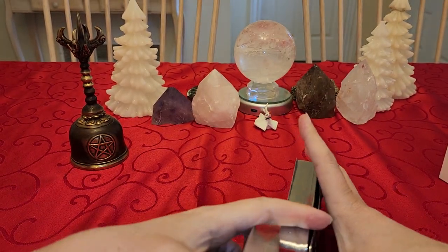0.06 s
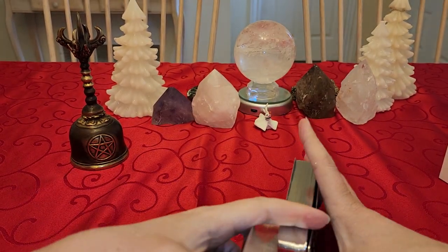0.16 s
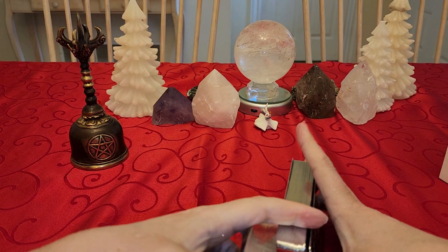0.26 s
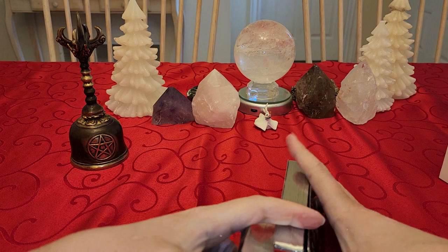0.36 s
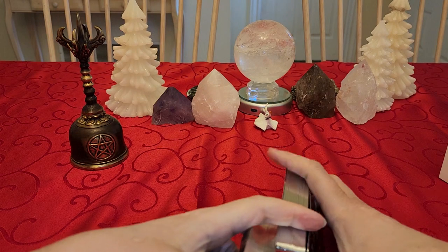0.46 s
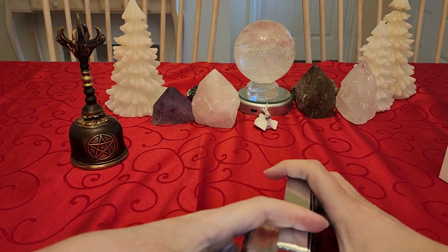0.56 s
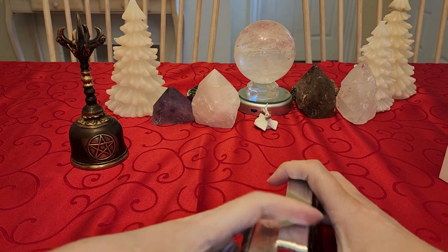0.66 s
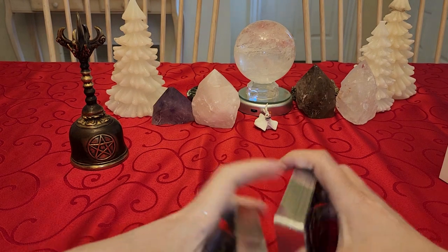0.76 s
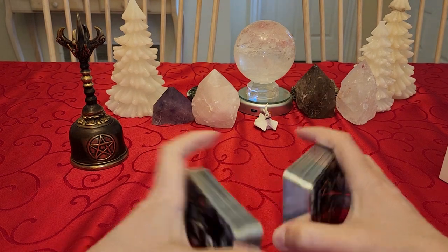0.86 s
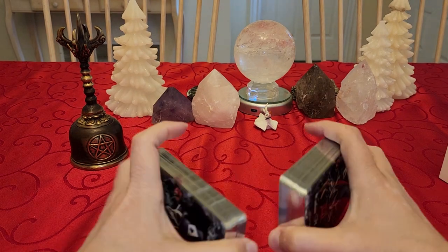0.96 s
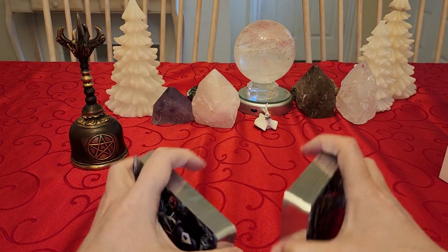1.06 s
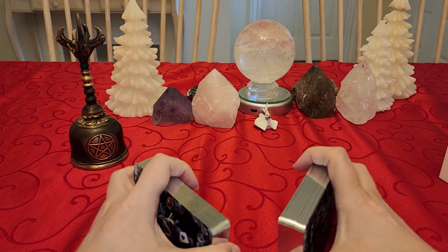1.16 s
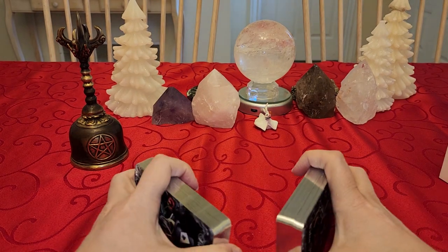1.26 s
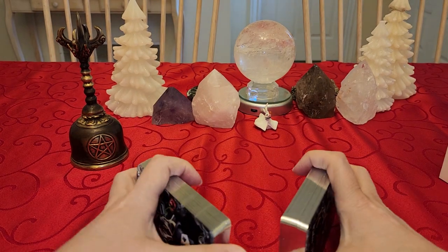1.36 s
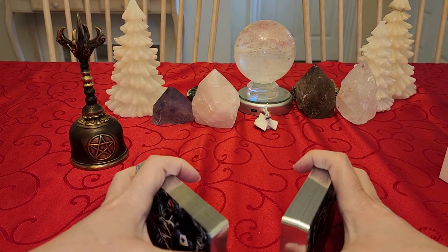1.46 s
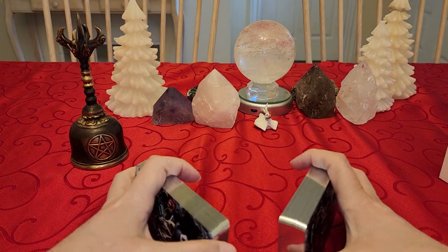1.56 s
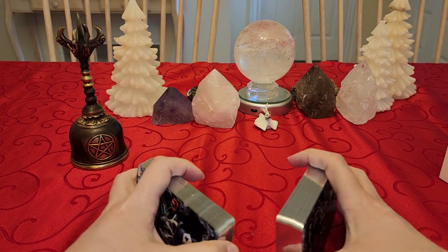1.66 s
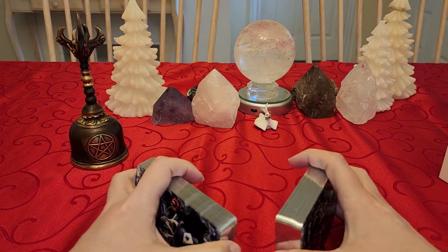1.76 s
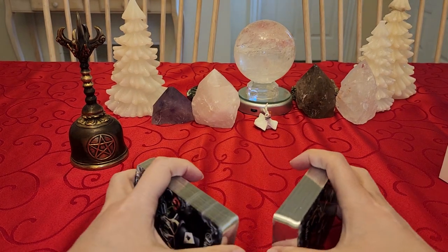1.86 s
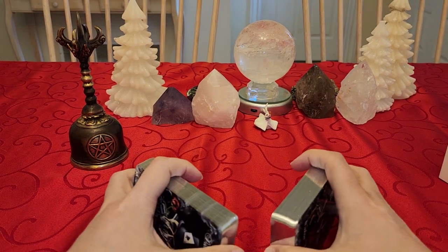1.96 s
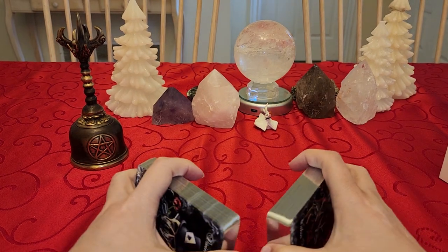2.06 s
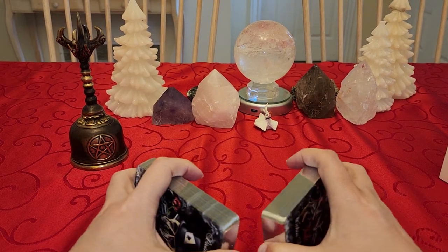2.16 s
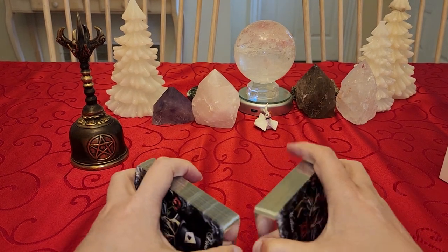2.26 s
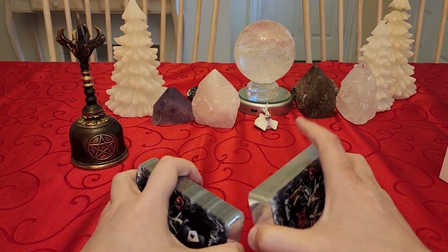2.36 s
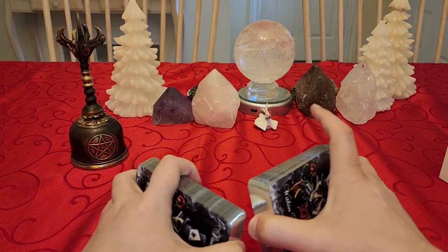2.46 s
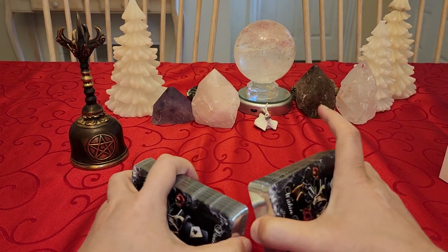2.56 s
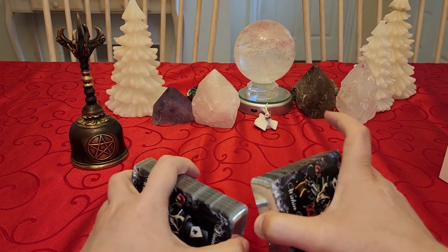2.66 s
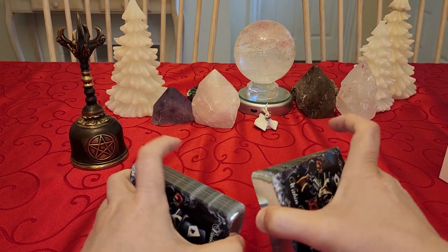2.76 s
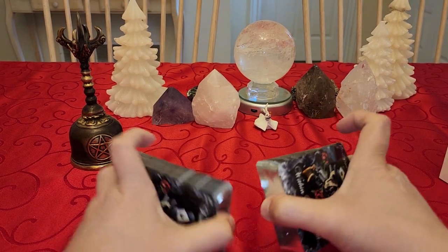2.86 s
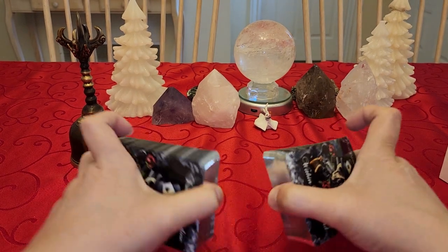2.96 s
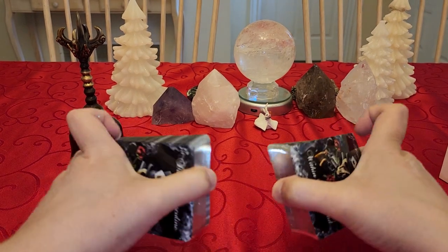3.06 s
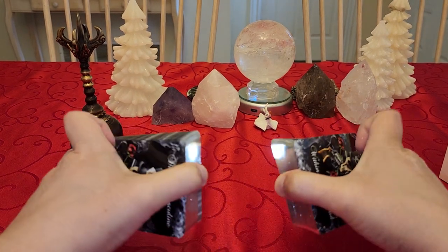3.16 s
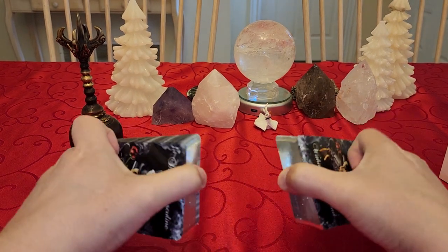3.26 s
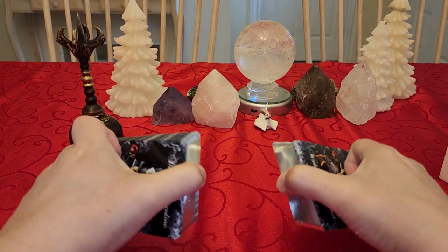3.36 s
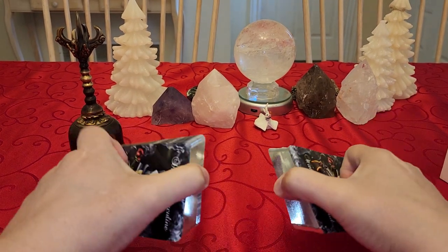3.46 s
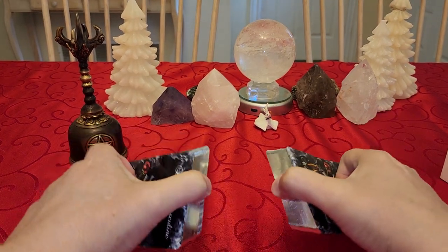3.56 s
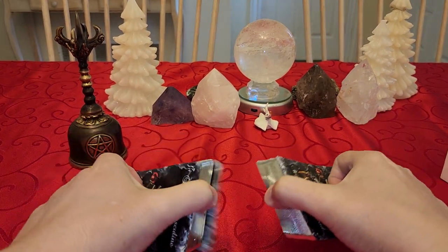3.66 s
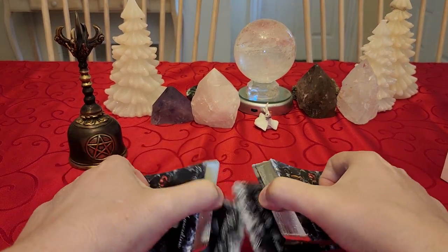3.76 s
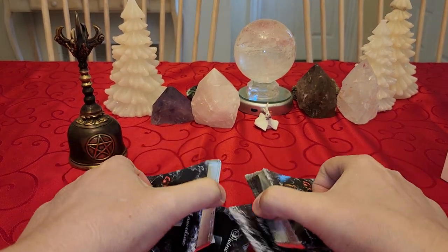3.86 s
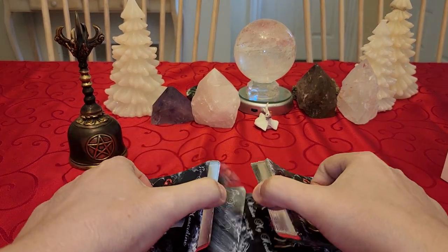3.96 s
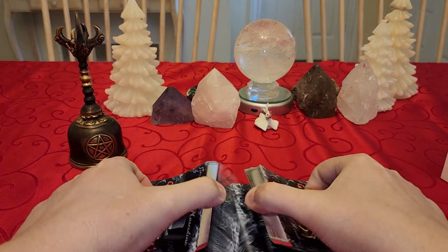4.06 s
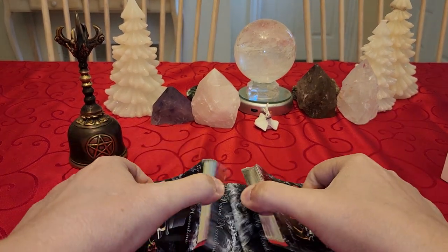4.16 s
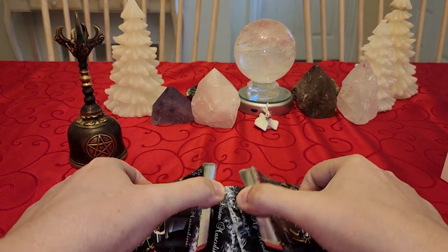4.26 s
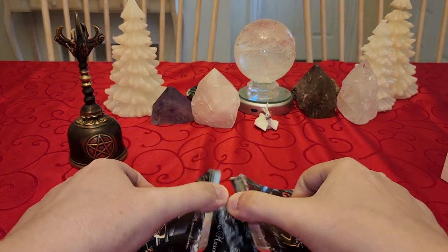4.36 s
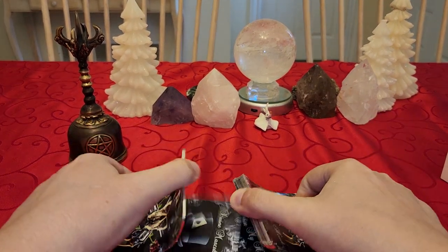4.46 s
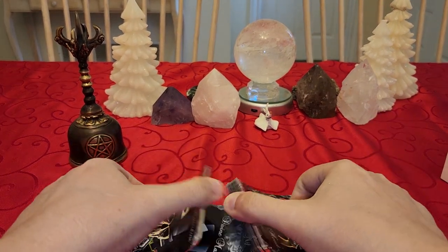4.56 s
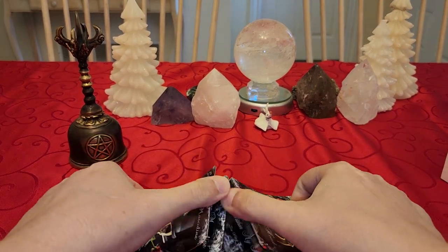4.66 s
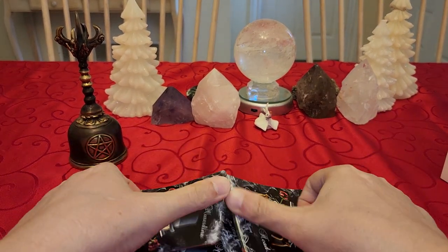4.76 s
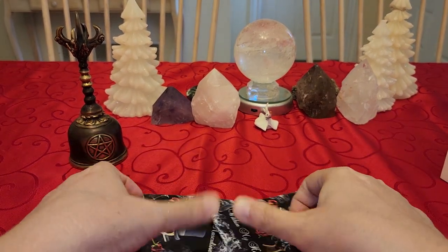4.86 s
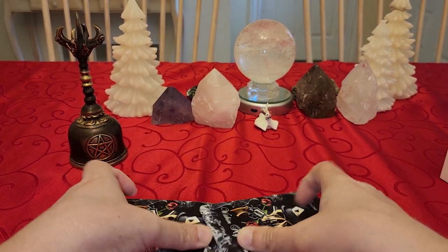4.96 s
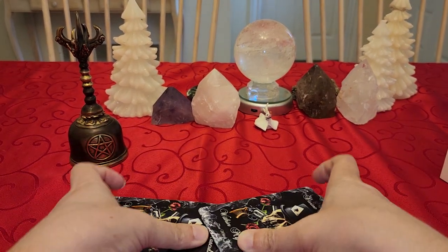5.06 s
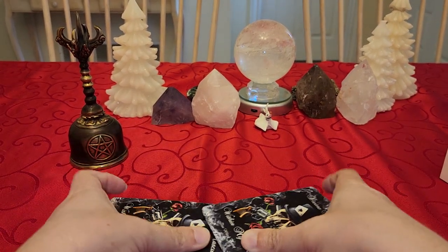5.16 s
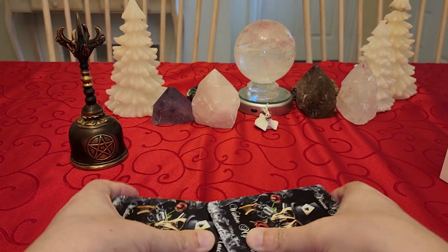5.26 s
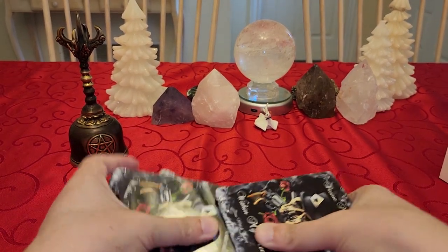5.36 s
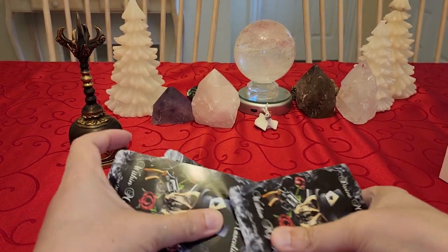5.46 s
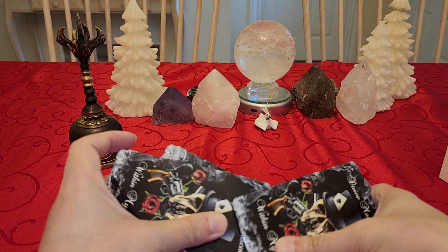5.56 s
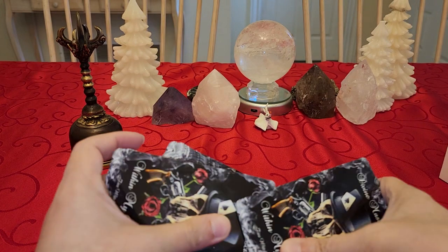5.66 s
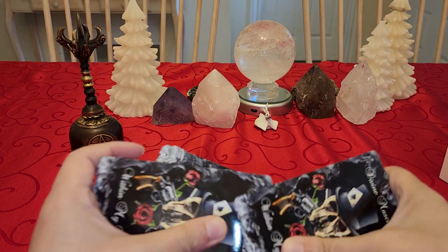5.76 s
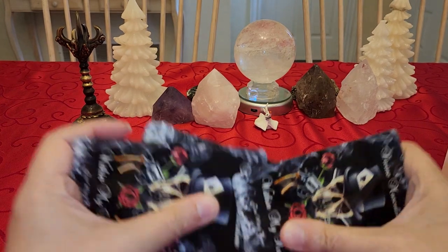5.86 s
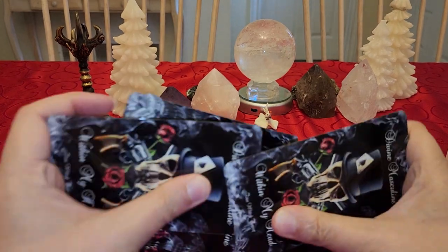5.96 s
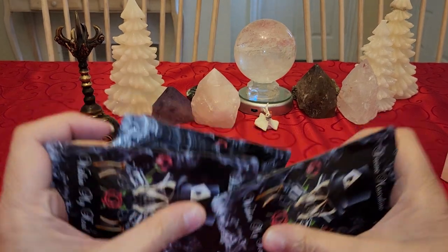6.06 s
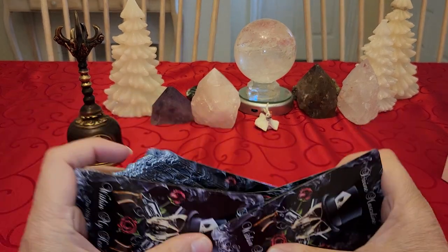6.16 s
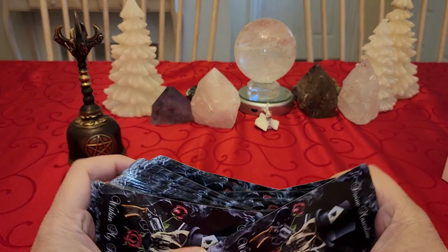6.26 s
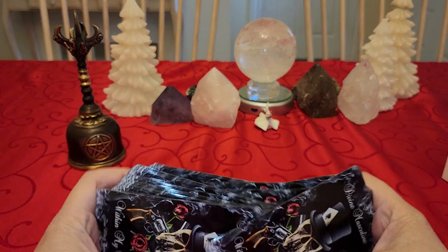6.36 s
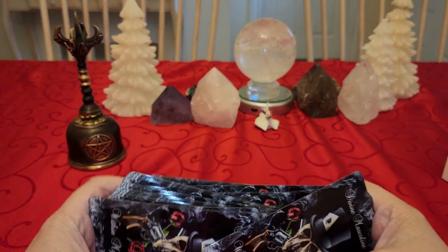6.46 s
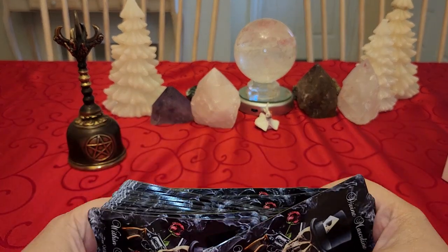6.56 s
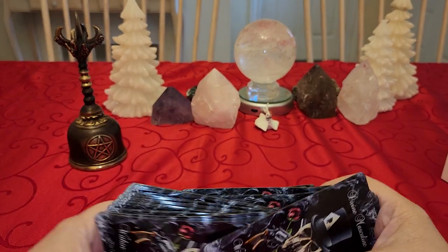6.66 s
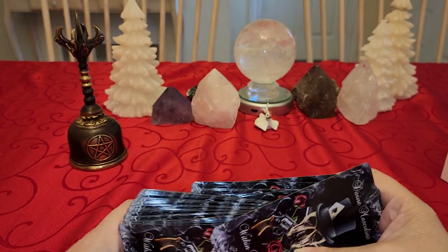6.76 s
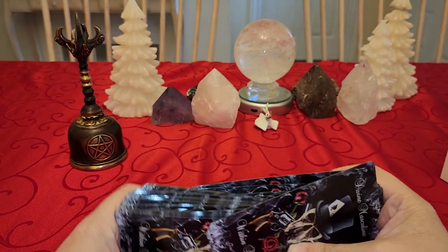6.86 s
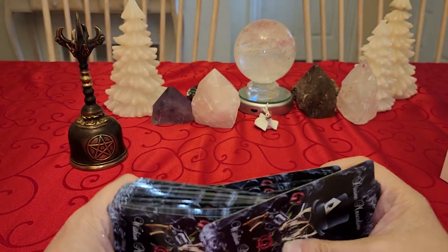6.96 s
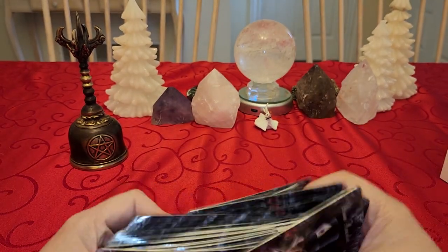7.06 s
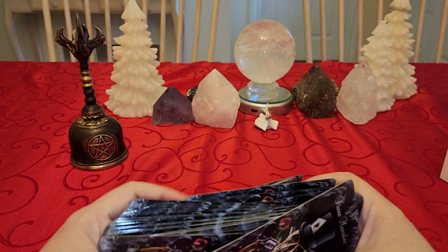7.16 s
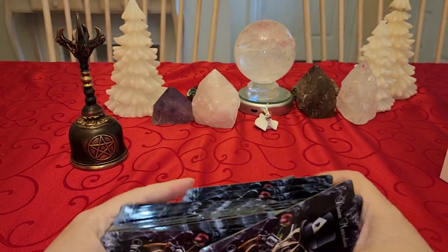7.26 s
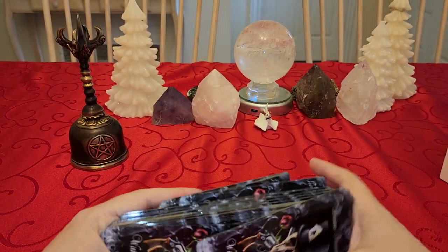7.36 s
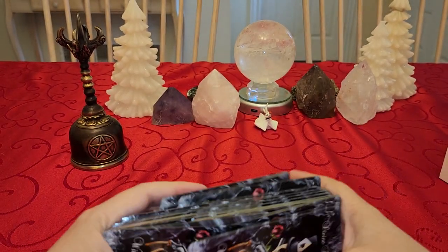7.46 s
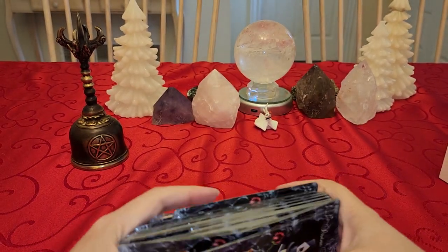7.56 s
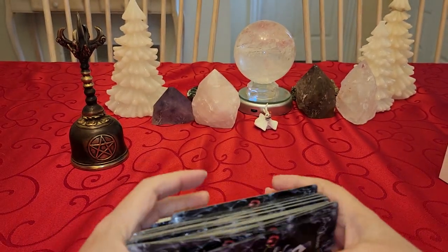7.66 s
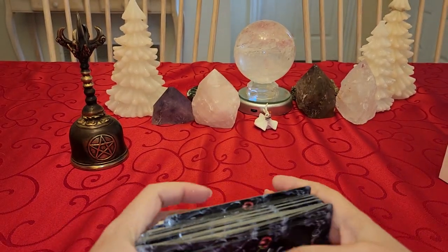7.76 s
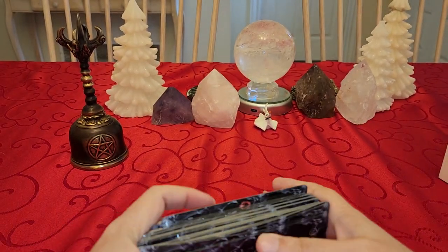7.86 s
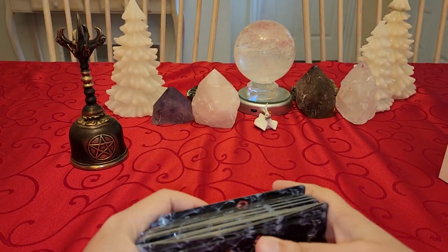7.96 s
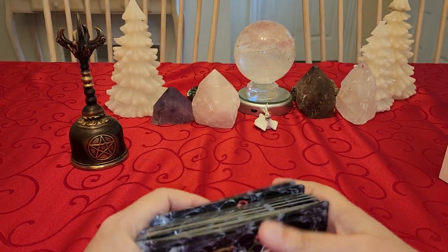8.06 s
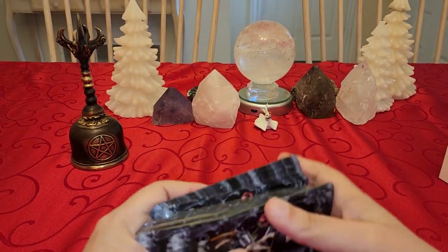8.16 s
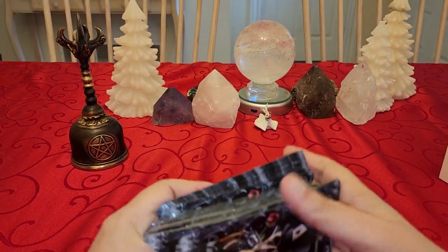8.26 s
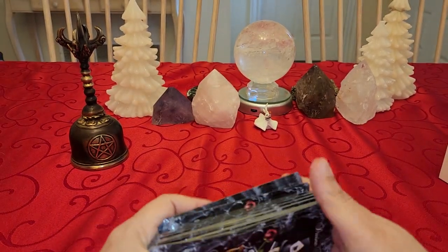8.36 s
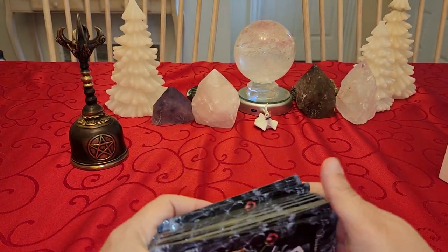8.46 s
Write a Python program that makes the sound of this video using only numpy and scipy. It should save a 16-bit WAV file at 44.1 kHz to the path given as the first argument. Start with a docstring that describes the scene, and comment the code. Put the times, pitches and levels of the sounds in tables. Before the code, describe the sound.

Close by in a small room, card halves thump softly, snap together in a quick riffle, whirr back, then slide and knock square.

```python
"""Small live room, cloth-covered table: a deck of stiff oracle cards is riffle-shuffled by hand.
The halves are set down (ringing table modes), packets snap off the thumbs and slap down (noise bursts, flex tones),
the woven deck cracks as it is bent and springs back (a dense run of flicks through resonances), then it is
slid together (uneven friction noise) and knocked square. Close stereo microphone; reverberant tail of
decaying noise; room rush of filtered noise with a low sine hum that wavers."""
import sys
import numpy as np
from scipy import signal
from scipy.fft import rfft, irfft
from scipy.io import wavfile
from scipy.ndimage import map_coordinates

SR = 44100
rng = np.random.default_rng(int(sys.argv[2]) if len(sys.argv) > 2 else 0)


def digitize_waveform(pressure):
    """Quantize a signal to 16-bit integers and store it at the path in sys.argv[1].

    Rows of a 2-D input are taken as channels; values are limited to [-1, 1].
    """
    field = np.atleast_2d(pressure).T
    bounded = np.clip(field, -1, 1)
    quanta = np.round(bounded * 32767).astype(np.int16)
    wavfile.write(sys.argv[1], SR, quanta)


N = 374850
TIME_S = np.arange(N) / SR

# Room rush spectrum: (frequency [Hz], gain [dB])
RUSH_SPECTRUM = [(20, -4.5), (110, 0), (160, -4.5), (210, 3), (400, -8), (510, -25.5), (670, -6.5),
                 (1000, -17.5), (2000, -16), (4000, -29.5), (7500, -27.5), (9500, -44), (16000, -43)]
RUSH_DB, HUM_DB, HUM_HZ = -58, -65, 199

# Fingers rubbing as they shift grip: (start [s], end [s], hiss level [dB])
RUBS = [(0, 0.665, -74), (1.278, 2.633, -78.5), (5.428, 6.096, -60.5), (6.235, 7.046, -61.5),
        (7.496, 8.296, -62.5)]
RUB_FADE_S, HOLD_DB = 0.067, -76  # HOLD_DB: faint hiss of the held cards throughout
# Single sliding strokes: (peak time [s], nominal half length [s], scrape drive [dB], hiss level [dB],
# resonance of the held cards [Hz])
SLIDES = [(1.356, 0.069, -88, -64, 1200), (2.442, 0.034, -72, -63, 1170), (2.674, 0.026, -59, -54.5, 1140),
          (3.062, 0.023, -78, -63, 2400), (4.854, 0.0086, -40, -36.5, 3030), (5.054, 0.15, -58, -57, 1390),
          (6.242, 0.017, -55, -53, 1900), (6.587, 0.13, -50.5, -57, 900), (6.902, 0.073, -53.5, -54, 990),
          (7.188, 0.018, -39.5, -41.5, 2420), (7.32, 0.094, -53.5, -55.5, 1250),
          (7.8, 0.034, -95, -53, 1200), (8.039, 0.038, -50, -52.5, 1130)]
STROKE_SKEW = 1.25  # rise = half length * skew, fall = half length / skew
# Card faces scraping: (frequency [Hz], gain [dB])
SCRAPE_SPECTRUM = [(60, -25), (370, -0.5), (520, -18), (800, -3), (1150, -3), (1400, -7), (1750, -1.5),
                   (2500, -10.5), (3300, -12.5), (5000, -13.5), (12000, -49)]
# Card edges, ticks and hiss: (frequency [Hz], gain [dB])
EDGE_SPECTRUM = [(1500, -12.5), (4000, -2.5), (5500, -4), (7400, -1), (9500, -9), (12000, -1.5),
                 (15000, -6), (17000, -14.5)]
# Card body crack: (frequency [Hz], gain [dB])
CRACK_SPECTRUM = [(150, -15.5), (400, -1.5), (600, -9), (1000, 1.5), (1500, -5.5), (2300, -3), (4000, -5.5),
                  (7000, -12.5), (16000, -28)]

# Reverberation spectrum: (frequency [Hz], gain [dB])
ROOM_SPECTRUM = [(40, -4.5), (140, -7.5), (230, 2), (800, -5), (2000, -3.5), (5000, 0.5), (16000, -5)]
# Reverberation time: (frequency [Hz], t60 [s])
ROOM_T60 = [(150, 0.64), (700, 0.38), (2000, 0.49), (13000, 0.26)]
# Partials of things standing on the table: (frequency [Hz], relative level [dB])
ORNAMENTS = [(511, -7.5), (659, 4.5), (785, 1.5), (883, -3.5), (986, -5.5), (1179, -3.5), (1416, -0.5),
             (1642, -2), (1760, -4), (2135, 3), (2449, -0.5), (3736, -0.5)]
ORNAMENT_T60_S = 0.28

# Deck knocking on the table: (time [s], relative boom level [dB], centre of the excited table modes [Hz],
# clack level [dB], nominal cloth cut-off [Hz])
KNOCKS = [(1.17, -30, 220, -38.5, 1650), (1.258, -34, 215, -51, 1490), (1.341, -32, 125, -58, 990),
          (1.836, -54, 137, -74, 500), (6.072, -64, 290, -56, 890), (6.204, -45.5, 233, -47.5, 1750),
          (6.262, -37, 385, -31, 1880), (6.31, -35.5, 384, -41.5, 1670), (6.461, -45.5, 235, -44.5, 1700),
          (6.574, -37, 150, -58, 1200), (6.86, -44.5, 229, -58, 1210), (7.019, -60, 268, -50.5, 2400),
          (7.19, -31.5, 229, -36.5, 1590), (7.199, -35, 229, -35.5, 1620), (7.483, -47, 241, -47.5, 1880),
          (8.46, -32, 280, -28.5, 1350)]
# Table-top modes: (frequency [Hz], relative level [dB], t60 [s])
TABLE_MODES = [(113.5, 7, 0.62), (146.5, 7, 0.41), (229, 3.5, 0.35), (256, -5, 0.6), (344.6, -9.5, 0.54),
               (371, 0, 0.3), (407, -1, 0.53)]
# Deck edges clacking down: (frequency [Hz], gain [dB])
CLACK_SPECTRUM = [(80, -9.5), (400, -2.5), (520, -10.5), (700, -8), (1100, 0), (1500, -2.5), (3000, -12)]
# Cloth softening a knock: (multiple of its cut-off [ratio], gain [dB])
CLOTH_LOSS = [(.93, -0.5), (1.15, -14), (1.8, -19), (3, -37)]
# Air slap and deck thud: (frequency [Hz], gain [dB])
SLAP_SPECTRUM = [(25, -10.5), (70, -2.5), (160, -3.5), (340, -1.5), (460, -9.5), (620, -15), (1500, -43),
                 (6000, -50.5)]

# Cards snapping free or slapping down; riffle from 3.9 s, woven deck bent from 5.4 s, cards catching
# from 6.3 s: (time [s], card body level [dB], edge tick level [dB], air slap level [dB], flex pitch [Hz])
SNAPS = [ (3.8955, -36, -39.5, -40.5, 1830), (4.0592, -17, -19, -31.5, 3160), (4.1225, -44, -48, -32, 900),
         (4.1305, -38, -31, -50, 2600), (4.181, -39, -35.5, -41, 3560), (4.191, -31, -39, -33.5, 1990),
         (4.217, -25, -24.5, -44, 2270), (4.2198, -23.5, -40, -35, 1760), (4.2238, -31.5, -33, -42, 3400),
         (4.251, -32, -24, -43, 3360), (4.2542, -25, -43, -33, 1060), (4.3195, -31, -27, -54, 2370),
         (4.3275, -29, -43, -28, 1510), (4.3322, -31.5, -33.5, -31, 3250), (4.434, -27, -24, -43, 3370),
         (4.454, -31.5, -40, -30, 1540), (4.4762, -43, -34, -47, 2820), (4.484, -35.5, -42, -30.5, 1700),
         (4.533, -22.5, -25, -27.5, 3400), (4.5352, -27, -45, -31.5, 1310),
         (4.574, -26.5, -47, -28.5, 1700), (4.579, -26, -36, -34, 2000), (4.5995, -41, -39, -39, 2470),
         (4.608, -32.5, -59, -30, 1300), (4.72, -31, -29.5, -28.5, 2380), (4.741, -28.5, -29.5, -55, 2100),
         (4.7455, -26, -40, -29.5, 1400), (4.803, -30, -44, -36.5, 1530), (4.864, -32, -32, -33.5, 3200),
         (4.881, -32, -30.5, -30.5, 2250), (4.938, -32.5, -37, -38.5, 3020), (5.439, -49.5, -68, -64, 1770),
         (5.585, -41, -62, -40, 1670), (5.602, -24.5, -52, -38, 2100), (5.6052, -20.5, -37, -30, 1800),
         (5.6456, -15, -33, -29, 2000), (6.272, -29, -32.5, -41, 1700), (6.607, -42, -52, -56, 2120),
         (7.173, -39, -44, -53, 2340), (7.191, -31.5, -40.5, -31, 2500), (8.151, -47, -54, -55, 2430)]
# Card bending modes: (multiple of flex pitch [ratio], relative level [dB])
CARD_MODES = [(1.004, 18.5), (1.45, -10.5)]
# Radiation of a bent card: (multiple of flex pitch [ratio], gain [dB])
FLEX_RADIATION = [(.6, 1), (0.878, 2.5), (1.2, 3), (1.7, -4)]

# Bent halves springing back through each other: (time [s], speed level [dB])
SPRING_SPEED = [(5.925, -21.5), (5.96, -7), (5.985, 3), (6.005, 5.5), (6.024, -10), (6.033, -23)]
# Woven-packet resonances before the glide: (frequency [Hz], width [Hz], relative level [dB])
PACKET_MODES = [(1164, 96, 5.5), (1750, 300, 10.5), (3120, 610, 3.5), (5300, 1000, 5.5), (7150, 300, 3)]
# Woven-packet spectral notch: (frequency [Hz], gain [dB])
PACKET_NOTCH = [(600, 1.5), (3700, 1), (4300, -6.5), (4900, 0.5)]
STRAIGHT_S, RISE_OCTAVES_PER_S = 6.0, 1.2  # time at rest pitch; rise as the cards straighten and stiffen

# Microphone balance: (frequency [Hz], left minus right [dB])
MIC_BALANCE = [(1500, 0), (5000, 1), (8000, -5.5), (13000, -6)]
RIGHT_LAG_US, LOW_CUT_HZ, TOP_HZ = 65.4, 15, 15900


def amp(db):
    """Decibels to gain."""
    return 10 ** (np.asarray(db) / 20)


def at_hz(points, hz):
    """Interpolate (Hz, value) points on a log-frequency axis."""
    f_hz, value = np.transpose(points)
    return np.interp(np.log(hz + 0.0011), np.log(f_hz), value)


def colour(x, points):
    """Minimum-phase filter with the given (Hz, dB) spectrum, via its folded cepstrum."""
    size = 4096
    gain = amp(at_hz(points, np.fft.rfftfreq(size, 1 / SR)))
    cepstrum = irfft(np.log(gain))
    cepstrum[1:size // 2] *= 2
    cepstrum[size // 2 + 1:] = 0
    response = irfft(np.exp(rfft(cepstrum)))[:size // 2]
    return signal.oaconvolve(x, response[None], axes=1)[:, :x.shape[1]]


def level(x, db, seconds):
    """Scale the mean channel energy to that of `seconds` at this rms level."""
    energy = np.mean(np.sum(x ** 2, axis=1))
    return x * amp(db) * np.sqrt(seconds * SR / energy)


def fade(t, t60_s):
    """Exponential decay, 60 dB down after t60_s."""
    return amp(-60 * t / t60_s)


def spread(db):
    """Left and right gains for a left-minus-right level."""
    return amp(np.array([[db], [-db]]) / 2)


def stereo_noise(n, apart_hz):
    """White noise: channels alike well below apart_hz, unrelated well above."""
    mid, side = rfft(rng.standard_normal((2, n)))
    f_hz = np.fft.rfftfreq(n, 1 / SR)
    share = .5 * f_hz ** 2 / (f_hz ** 2 + apart_hz ** 2)
    mid, side = mid * np.sqrt(1 - share), side * np.sqrt(share)
    return irfft(np.array([mid + side, mid - side]), n)


def add(track, s, sound):
    """Mix a sound in at time s."""
    i = int(s * SR)
    track[:, i:i + sound.shape[1]] += sound[:, :max(N - i, 0)]


def resonate(x, peaks):
    """Pass a sound through parallel (Hz, width Hz, dB) resonances."""
    total = 0
    for hz, width_hz, db in peaks:
        rung = signal.lfilter(*signal.iirpeak(hz, hz / width_hz, SR), x)
        total = total + amp(db) * level(rung, 0, x.shape[1] / SR)
    return total


def ambience(waver_db=3):
    """Low room rush plus a faint hum drifting in level and phase."""
    rush = level(colour(stereo_noise(N, 530), RUSH_SPECTRUM), RUSH_DB, N / SR)
    drift = np.interp(TIME_S, np.linspace(0, N / SR, 60), rng.standard_normal(60))
    hum = amp(waver_db * drift) * np.sin(2 * np.pi * HUM_HZ * TIME_S + drift)
    return rush + level(hum[None], HUM_DB, N / SR)


def friction(points, grain_db, grain_hz):
    """Card stock catching and slipping: noise in tiny uneven bursts, rms 1."""
    knots_s = np.cumsum(rng.exponential(1, N // 16)) / grain_hz
    strength = np.clip(rng.standard_normal(len(knots_s)), -2, 2.5)
    grip = amp(grain_db * np.interp(TIME_S, knots_s, strength))
    return level(colour(stereo_noise(N, 1740) * grip, points), 0, N / SR)


def slides(rub_scrape_db=-3, roundness=1.48, resonance_db=-2, broad_db=-4, sharpness=3.5,
           ticks_hz=260, tick_db=-7):
    """Strokes swell and stop, ringing the held cards; finger rubs hiss, scrape and crackle softly."""
    scrape, hiss = np.zeros((2, N)), np.zeros(N)
    grains = friction(SCRAPE_SPECTRUM, grain_db=5.5, grain_hz=458.6)
    for s, half_s, scrape_db, hiss_db, hz in SLIDES:
        rise_s, fall_s = half_s * STROKE_SKEW, half_s / STROKE_SKEW
        span = slice(*np.searchsorted(TIME_S, [s - 10 * rise_s, s + 10 * fall_s]))
        distance = np.maximum((s - TIME_S[span]) / rise_s, (TIME_S[span] - s) / fall_s)
        speed = np.exp(-distance ** roundness)
        rung = resonate(grains[:, span], [(hz, hz / sharpness, resonance_db)])
        scrape[:, span] += amp(scrape_db) * speed * (rung + amp(broad_db) * grains[:, span])
        hiss[span] += amp(hiss_db) * speed

    rub = amp(HOLD_DB)
    for start_s, end_s, db in RUBS:
        inside_s = np.minimum(TIME_S - start_s, end_s - TIME_S)
        rub = rub + amp(db) * np.clip(.5 + inside_s / (2 * RUB_FADE_S), 0, 1)
    catches = (rng.random(N) < ticks_hz / SR) * rng.random(N)
    ticks = level(colour(catches * rng.uniform(0.91, 1, (2, N)), CRACK_SPECTRUM), tick_db, N / SR)
    rubbing = rub * (amp(rub_scrape_db) * grains + ticks)
    hissing = np.hypot(hiss, rub) * friction(EDGE_SPECTRUM, grain_db=2.5, grain_hz=601)
    return scrape + rubbing + hissing


def ornaments(t):
    """Ring of things on the table; each partial has its own phase at each microphone."""
    common = rng.uniform(0, 2 * np.pi, (len(ORNAMENTS), 1, 1))
    phases = common + .5 * rng.standard_normal((len(ORNAMENTS), 2, 1))
    partials = (amp(db) * np.sin(2 * np.pi * hz * t + phase) for (hz, db), phase in zip(ORNAMENTS, phases))
    return fade(t, ORNAMENT_T60_S) * sum(partials)


def room(x, wet_db, first_s=0.0067, build_s=0.0024, ornament_db=-23):
    """Reflections build after a few ms, each octave decaying at its own rate; things on the table ring along."""
    t = np.arange(SR * 3 // 4) / SR
    spectrum, f_hz = rfft(stereo_noise(len(t), 700)), np.fft.rfftfreq(len(t), 1 / SR)
    octaves_hz = np.geomspace(125, 16000, 8)
    tail = 0
    for hz, band in zip(octaves_hz, np.eye(len(octaves_hz))):
        band_noise = irfft(spectrum * at_hz(np.c_[octaves_hz, band], f_hz), len(t))
        tail = tail + band_noise * fade(t, at_hz(ROOM_T60, hz))
    build = np.clip((t - first_s) / build_s, 0, 1)
    tail = colour(level(tail * build, wet_db, 1 / SR), ROOM_SPECTRUM)
    response = tail + level(ornaments(t), ornament_db, 1 / SR)
    return signal.oaconvolve(x, response, axes=1)[:, :N]


def knocks(reach_octaves=0.344, clack_t60_s=0.15, thud_t60_s=0.25, boom_db=-1.5, thud_db=-7, ornament_db=-6):
    """Deck lands through the cloth: table and ornaments ring, the deck thuds, its edges clack."""
    rings, blows = np.zeros((2, N)), np.zeros((2, N))
    t = np.arange(SR // 2) / SR
    boom_window_s, clack_window_s = .04, .02
    for s, db, centre_hz, clack_db, cut_hz in KNOCKS:
        # modes near centre_hz answer most; signs alternate
        boom = 0
        for k, (hz, mode_db, t60_s) in enumerate(TABLE_MODES):
            reach = np.exp(-(np.log2(hz / centre_hz) / reach_octaves) ** 2 / 2)
            mode = np.sin(2 * np.pi * hz * t) * fade(t, t60_s)
            boom = boom + amp(mode_db) * reach * (-1) ** k * mode
        thud = colour(stereo_noise(len(t), 820) * fade(t, thud_t60_s), SLAP_SPECTRUM)
        cloth = [(cut_hz * ratio, gain_db) for ratio, gain_db in CLOTH_LOSS]
        clack = colour(stereo_noise(len(t), 730) * fade(t, clack_t60_s), CLACK_SPECTRUM)
        clack = colour(clack, cloth)
        chime = colour(ornaments(t), cloth)
        add(rings, s, level(boom[None], db + boom_db, boom_window_s))
        add(rings, s, level(chime, clack_db + ornament_db, clack_window_s))
        add(blows, s, level(thud, db + thud_db, boom_window_s))
        add(blows, s, level(clack, clack_db, clack_window_s))
    return rings, blows


def snaps(events, crack_t60_s=0.017, edge_t60_s=0.0099, ring_t60_s=0.013, slap_t60_s=0.043, ring_share_db=-8,
          click_db=11, swell_db=-20, swell_s=0.0047, slap_send_db=-5, edge_send_db=-1.5):
    """Each snap swells in faintly for a few ms, then ticks, flexes and puffs out air; near sound and room send."""
    near, sent = np.zeros((2, N)), np.zeros((2, N))
    window_s, lead = .005, 512  # lead in samples
    t = np.arange(-lead, SR // 16) / SR
    after, release = np.maximum(t, 0), (t == 0)[None] * 1.
    swell = amp(swell_db) * np.exp(np.minimum(t, 0) / swell_s)
    crack_envelope = np.where(t < 0, swell, fade(after, crack_t60_s))
    edge_envelope = np.where(t < 0, swell, fade(after, edge_t60_s))
    slap_envelope = (t >= 0) * fade(after, slap_t60_s)
    # summed over all directions a snap is a smooth click: this feeds the room
    body_click = colour(release, CRACK_SPECTRUM)
    edge_click = colour(release, EDGE_SPECTRUM)
    slap_click = colour(release, SLAP_SPECTRUM)
    for s, body_db, edge_db, slap_db, flex_hz in events:
        crack = amp(click_db) * release + stereo_noise(len(t), 2700) * crack_envelope
        crack = colour(crack, CRACK_SPECTRUM)
        # free card length differs per packet, hence flex_hz
        modes = sum(amp(db) * np.sin(2 * np.pi * flex_hz * ratio * after) for ratio, db in CARD_MODES)
        ring = fade(after, ring_t60_s) * modes
        flex = [(flex_hz * ratio, db) for ratio, db in FLEX_RADIATION]
        body = level(colour(crack, flex), 0, window_s) + level(ring[None], ring_share_db, window_s)
        edge = colour(stereo_noise(len(t), 2000) * edge_envelope, EDGE_SPECTRUM)
        slap = colour(8 * release + stereo_noise(len(t), 1400) * slap_envelope, SLAP_SPECTRUM)
        parts = [(body, body_db, colour(body_click, flex), 0),
                 (edge, edge_db, edge_click, edge_send_db),
                 (slap, slap_db, slap_click, slap_send_db)]
        for sound, db, click, send_db in parts:
            add(near, s - lead / SR, level(sound, db, window_s) * spread(-1.3))
            add(sent, s - lead / SR, level(click, db + send_db, window_s))
    return near, sent


def loose_cards(events, below_db=-12, edge_db=-5, mean_delay_s=0.035, tick_t60_s=0.007, count=3):
    """A few single cards patter down after each packet as short decaying noise ticks."""
    force, t = np.zeros((1, N)), np.arange(SR // 50) / SR
    for s, body_db, *_ in events:
        for wait, size in rng.random((count, 2)):
            tick = size * amp(body_db + below_db) * fade(t, tick_t60_s)
            add(force, s + 2 * mean_delay_s * wait, tick[None])
    noise = stereo_noise(N, 2000)
    body = level(colour(noise, CRACK_SPECTRUM), 0, N / SR)
    edge = level(colour(noise, EDGE_SPECTRUM), edge_db, N / SR)
    return force * (body + edge)


def glide(x, start_s, end_s):
    """Play a sound ever faster between two times, raising its resonances."""
    octaves = RISE_OCTAVES_PER_S * (np.clip(TIME_S, start_s, end_s) - STRAIGHT_S)
    position = np.cumsum(2 ** octaves)
    return np.array([map_coordinates(channel, [position], order=3, mode="mirror") for channel in x])


def spring(rasp_db=-35, hiss_db=-34, flicks_hz=1500, size_db=2):
    """Card edges skip over one another in a dense run, ringing the packet; flicks_hz is before the glide."""
    times_s = np.cumsum(rng.uniform(.2, 1.8, N // 16)) / flicks_hz
    times_s = times_s[times_s < (N - 1) / SR]
    sizes = amp(size_db * rng.standard_normal(len(times_s))) * rng.choice([-1, 1], len(times_s))
    impulses = np.bincount((times_s * SR).astype(int), sizes, N)
    flicks = level(impulses[None], 0, N / SR) + stereo_noise(N, 1300)
    rasp = glide(resonate(flicks, PACKET_MODES), SPRING_SPEED[0][0], SPRING_SPEED[-1][0])
    hiss = colour(flicks, EDGE_SPECTRUM)
    # silent outside the run
    speed = amp(np.interp(TIME_S, *np.transpose(SPRING_SPEED), left=-np.inf, right=-np.inf))
    both = level(rasp, rasp_db, N / SR) + level(hiss, hiss_db, N / SR)
    return speed * colour(both, PACKET_NOTCH)


def scene(blow_send_db=3.5, slide_send_db=0):
    """Cards and table close by, with the room around them."""
    background = ambience()
    rustle = slides()
    rings, blows = knocks()
    cards, cards_sent = snaps(SNAPS)
    rustle = rustle + loose_cards(SNAPS) + spring()
    radiated = cards_sent + amp(blow_send_db) * blows + amp(slide_send_db) * rustle
    return cards + rings + blows + rustle + room(radiated, wet_db=-5.5) + background


def record(dry):
    """Microphone pair: spectral balance, right channel lagging slightly, rumble and top cut."""
    left = colour(dry[:1], [(hz, db / 2) for hz, db in MIC_BALANCE])
    right = colour(dry[1:2], [(hz, -db / 2) for hz, db in MIC_BALANCE])
    lag_s = RIGHT_LAG_US / 1e6
    right = irfft(rfft(right) * np.exp(-2j * np.pi * np.fft.rfftfreq(N, 1 / SR) * lag_s), N)
    low_cut = signal.butter(2, LOW_CUT_HZ, "highpass", fs=SR, output="sos")
    top_cut = signal.ellip(10, .2, 70, TOP_HZ, fs=SR, output="sos")
    both = signal.sosfilt(low_cut, np.vstack([left, right]))
    return signal.sosfilt(top_cut, both)


dry = scene()
out = record(dry)
digitize_waveform(out)
```